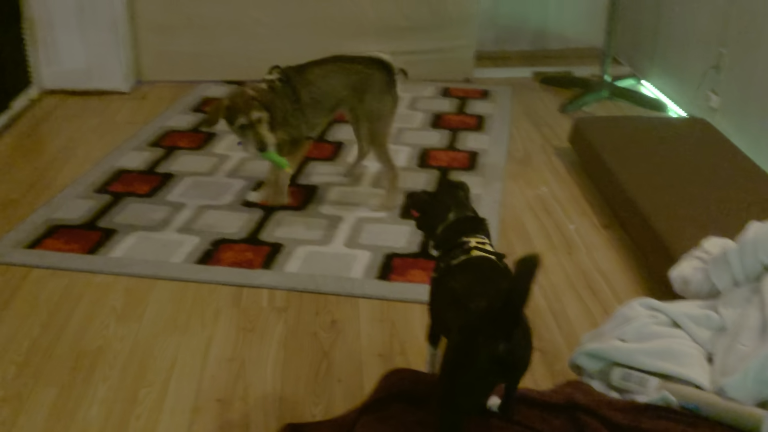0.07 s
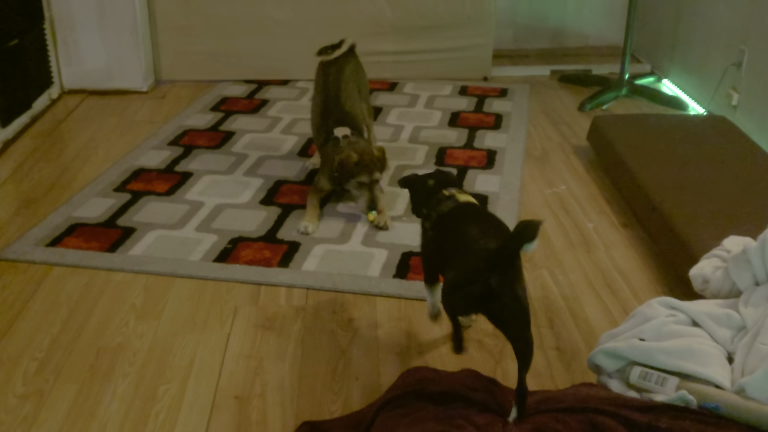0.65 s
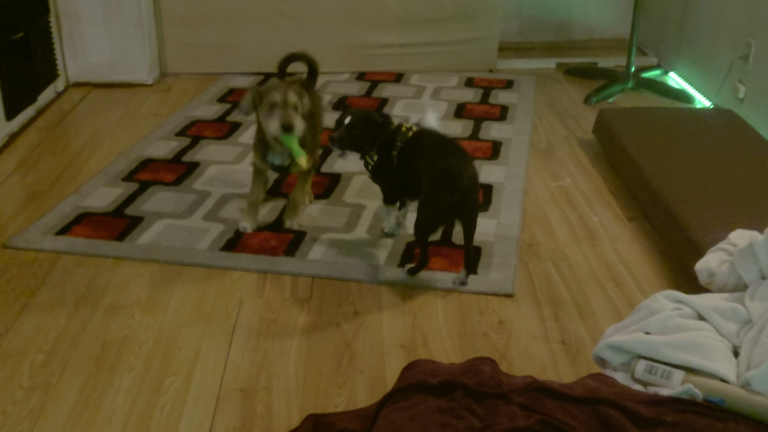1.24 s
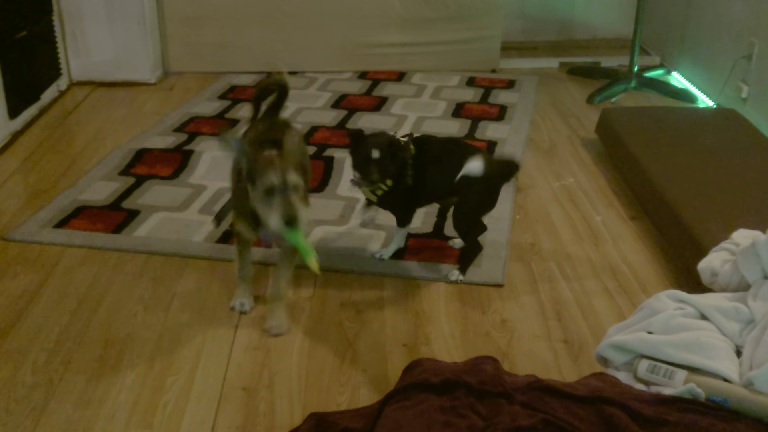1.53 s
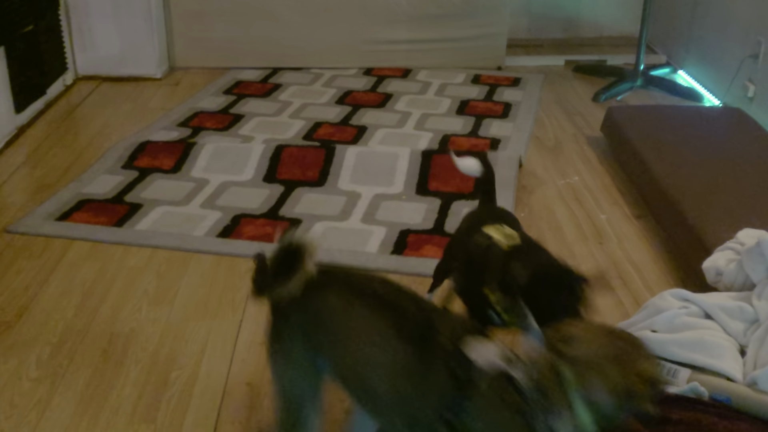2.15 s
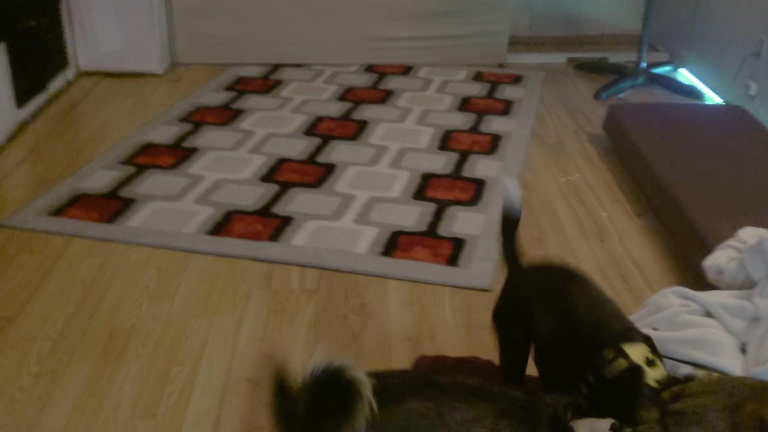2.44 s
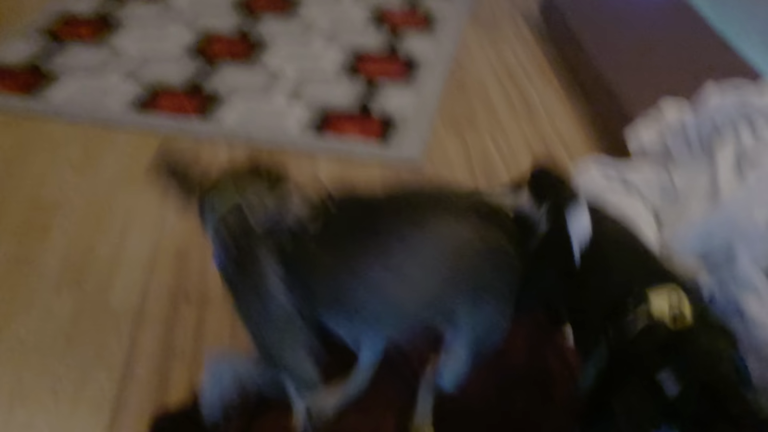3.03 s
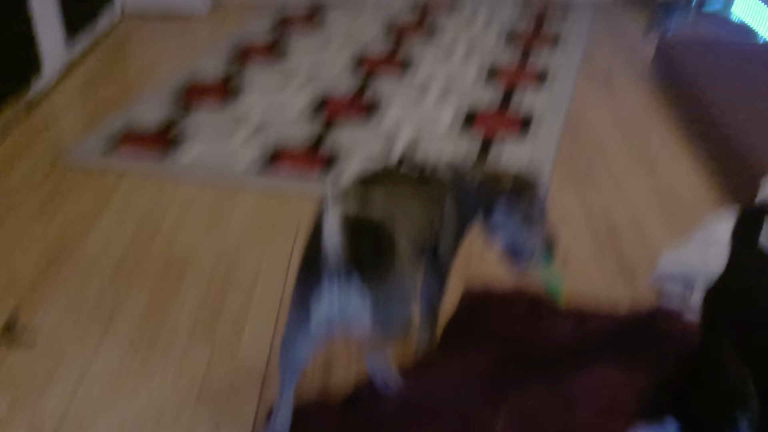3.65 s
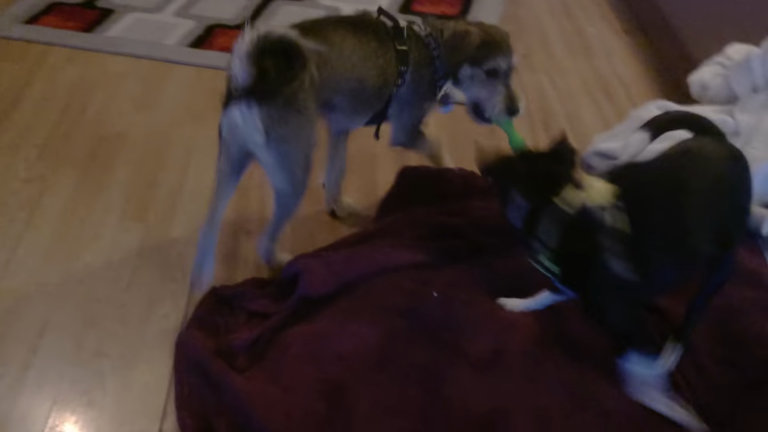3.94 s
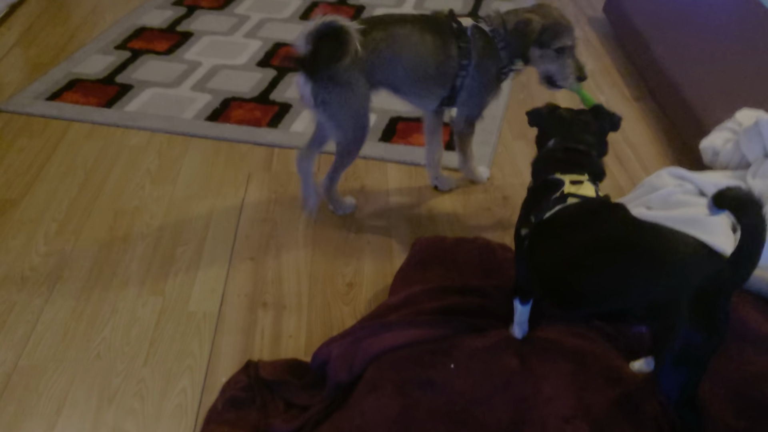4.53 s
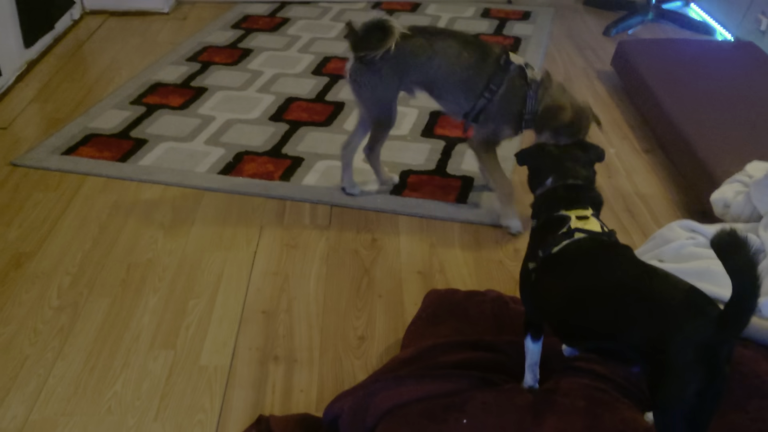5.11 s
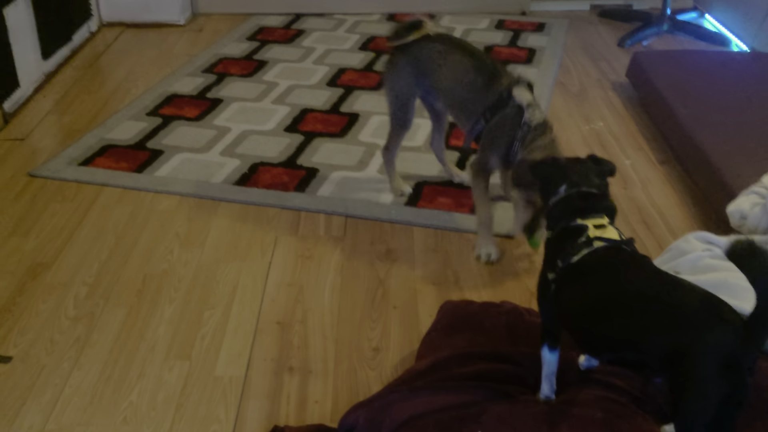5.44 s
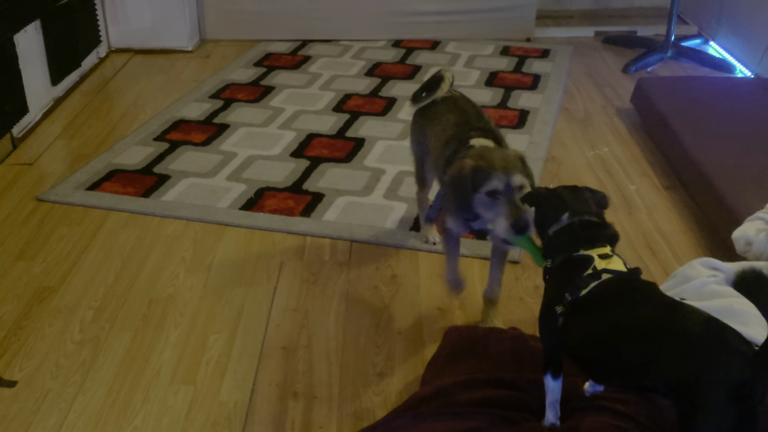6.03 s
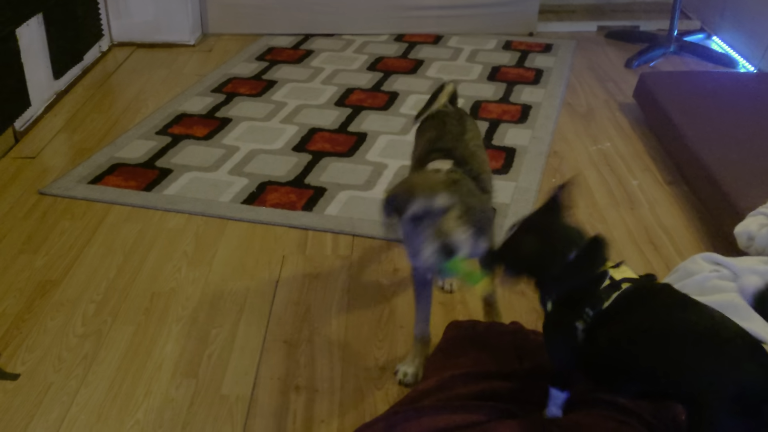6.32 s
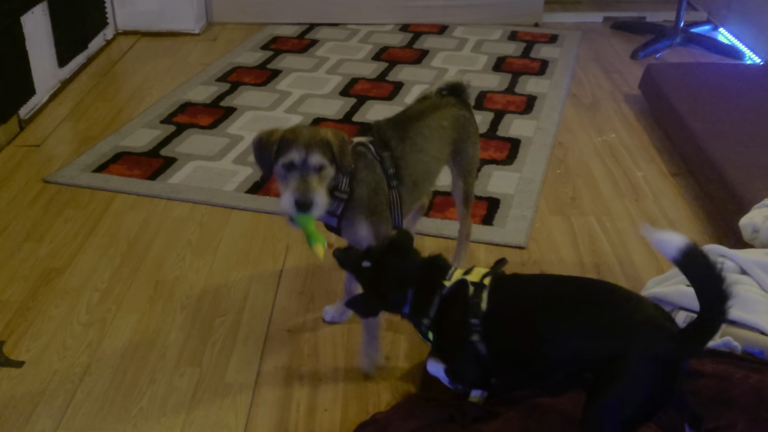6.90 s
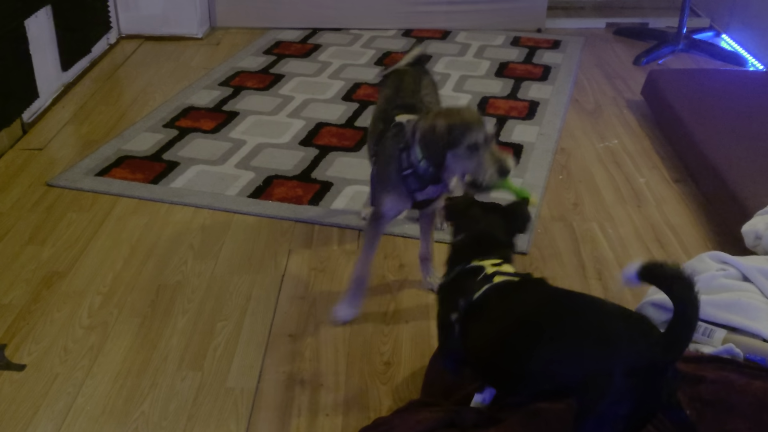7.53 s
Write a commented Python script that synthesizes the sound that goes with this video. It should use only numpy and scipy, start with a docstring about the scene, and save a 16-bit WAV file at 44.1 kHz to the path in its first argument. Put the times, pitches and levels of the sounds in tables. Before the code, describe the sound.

Over the steady low hum of an appliance, two dogs start with a few light steps, then dash about, claws clicking and scraping on wooden boards, metal tags clinking and paws landing with dull knocks. The rush eases into occasional taps and jingles, with brief livelier moments midway and near the end. The small living room adds a short echo, and the claws sound crisp.

```python
"""Two dogs romp with a toy on a wooden floor and a rug in a small living room.
Their claws tap and skid, their metal collar tags knock together and ring, and their paws thud.
Something rubbery squeaks. Rustling and light steps get louder when the dogs are livelier.
An appliance hums underneath, and the right microphone opening rings near 5 kHz."""
import sys
import numpy as np
from scipy import signal
from scipy.fft import rfft, irfft, next_fast_len
from scipy.io import wavfile

SR = 44100
rng = np.random.default_rng(int(sys.argv[2]) if len(sys.argv) > 2 else 0)


def digitize_waveform(pressure):
    """Quantize a signal to 16-bit integers and store it at the path in sys.argv[1].

    Rows of a 2-D input are taken as channels; values are limited to [-1, 1].
    """
    field = np.atleast_2d(pressure).T
    bounded = np.clip(field, -1, 1)
    quanta = np.round(bounded * 32767).astype(np.int16)
    wavfile.write(sys.argv[1], SR, quanta)


N = 342657

# Claws hitting the boards: start_s, tap_db, skid_db
CLAW_HITS = [(0.151, -44, -34.5), (0.625, -53, -37), (0.69, -42, -49), (0.7283, -52, -41),
             (0.838, -35.5, -36.5), (1.3486, -20.5, -27.5), (1.462, -41, -41), (1.493, -36, -42),
             (1.5387, -15, -21.5), (1.582, -15, -28.5), (1.697, -22, -30), (1.7085, -15, -42),
             (1.7956, -28, -21), (1.8515, -37, -36), (1.9309, -27, -24), (2.0027, -25, -43),
             (2.0875, -24, -29.5), (2.38, -45, -51), (2.5434, -32, -44), (3.06, -39.5, -76),
             (3.3266, -29, -42), (4.071, -27.5, -45), (4.298, -38, -42), (4.582, -37, -51),
             (4.691, -45.5, -56), (5.894, -51.5, -41.5), (6.0921, -47, -41.5), (6.7007, -27.5, -34),
             (6.8402, -25, -59), (7.0102, -44.5, -50), (7.432, -29, -38)]
# The tone of claws on wood: pitch_hz, gain_db
CLAW_TONE = [(200, -9), (700, -6), (1500, -2), (2500, -1.5), (4500, 0), (6200, -0.5), (10000, -1.5),
             (13000, -1.5), (16000, -1.5)]
def claws(tap_gain_db=11, skid_gain_db=15, tap_s=0.00096, skid_s=0.0059, ring_hz=5500):
    """The claws of a paw land almost together, then skid in tiny slips, ringing a little."""
    out, t = np.zeros((2, N)), np.arange(SR // 8) / SR
    for start_s, tap_db, skid_db in CLAW_HITS + light_steps():
        pitch_hz = ring_hz * np.exp(0.04 * rng.normal())   # no two claws ring alike
        tap = grains(12000, 3.3, len(t)) * t * np.exp(-(t / tap_s) ** 2 / 2)
        skid = grains(3500, 27, len(t)) * (t / skid_s) ** 0.45 * np.exp(-t / skid_s)
        tap, skid = [unit_energy(x + resonance(x, pitch_hz, width_hz=1700)) for x in (tap, skid)]
        add(out, start_s, from_db(tap_db + tap_gain_db) * tap + from_db(skid_db + skid_gain_db) * skid)
    return shape_tone(out, CLAW_TONE)


def light_steps(per_s=5, running_db=-40, uneven_db=6):
    """Extra claw hits at random moments: faint, but stronger when the dogs are lively."""
    steps = []
    for step, luck in enumerate(rng.random((60, 3))):
        start_s = (step + luck[0]) / per_s
        tap_db, skid_db = running_db + liveliness_db(start_s) + uneven_db * (2 * luck[1:] - 1)
        if start_s < N / SR:
            steps.append((start_s, tap_db, skid_db))
    return steps


# Paws sliding on the boards: start_s, level_db, length_s
PAW_SLIDES = [(1.081, -30, 0.079), (1.674, -25, 0.028), (1.795, -30.5, 0.04), (1.849, -25, 0.041),
              (1.936, -25.5, 0.042), (2.133, -31, 0.047), (2.2, -28, 0.044), (2.482, -40, 0.18),
              (3.338, -36.5, .025), (3.554, -27, 0.055), (4.068, -42.5, 0.13), (4.294, -31.5, 0.051),
              (5.539, -43, 0.16), (6.283, -44.5, 0.098), (7.424, -38, 0.08)]
def slides(gain_db=-10, slips_per_s=3500):
    """Claws catch on the wood as a paw slides; the scrape swells quickly and fades."""
    out, t = np.zeros((2, N)), np.arange(SR // 4) / SR
    for start_s, level_db, length_s in PAW_SLIDES:
        pressure = np.sin(np.pi * np.minimum(t / length_s, 1) ** 0.52)
        slips = unit_power(grains(slips_per_s, 4.7, len(t)))
        add(out, start_s, from_db(level_db + gain_db) * pressure * slips)
    return shape_tone(out, CLAW_TONE)


# Collar tags knocking together: start_s, clash_db, ring_db, small_tag_share (0 to 1)
TAG_KNOCKS = [(0.3207, -51, -62, 0.2), (0.7276, -37, -51, .1), (0.783, -37, -51, 1),
              (0.9784, -40, -39.5, 0.91), (1.1836, -38, -38, 0.7), (1.2451, -33, -37, .05),
              (1.3148, -18, -28, 0.6), (1.3472, -8, -29, 0.03), (1.4126, -45, -54, .15),
              (1.507, -33, -38, 0), (1.5742, -27, -32.5, 0.47), (1.684, -19, -24, 0.88),
              (1.7064, -12.5, -33, 0.24), (1.93, -25, -39.5, .6), (2.158, -26, -46, .9),
              (2.3515, -33, -48.5, 0), (2.392, -27, -41, 0.27), (2.5425, -18, -39, 0.7),
              (2.5516, -24, -24, 0.67), (2.6617, -30, -34.5, 0.17), (2.7969, -27, -42, .05),
              (2.858, -25, -36, 0), (3.016, -38, -47.5, 0.2), (3.1868, -38, -54, 0.2),
              (3.4657, -36, -42.5, 0.1), (3.8426, -40, -56, 0.6), (3.934, -20.5, -41.5, .15),
              (4.038, -43, -39.5, 0.96), (4.073, -24, -42.5, .2), (4.4459, -33.5, -49, 0.3),
              (4.5125, -38, -47, 0.4), (5.1357, -50, -59.5, .15), (5.464, -57, -56, 0.1),
              (5.5911, -38, -45, .1), (6.1, -52, -52.5, .2), (6.2565, -46, -49, 0.4),
              (6.6358, -37, -49, .05), (7.009, -28.5, -48.5, 0.3), (7.4794, -41, -50, 0.7),
              (7.596, -55, -42, 0.5)]
# The notes of each tag: pitch_hz, level_db, fade_s (time to fall by 60 dB)
LARGE_TAG_NOTES = [(3569, -17, 0.11), (7560, -2.5, .09), (9380, 0.5, 0.13), (9500, -5, .12),
                   (11130, 2, 0.2), (11040, 1.5, 0.16), (14000, 0, 0.1)]
SMALL_TAG_NOTES = [(5146, -20.5, 0.38), (6540, -15.5, 0.099), (9500, 2, 0.12), (13050, -3.5, 0.057),
                   (13250, -2, 0.12), (13850, -7.5, 0.099)]
def tags(ring_gain_db=-4, clash_gain_db=11, chatter_s=0.0026, bounce_s=0.016, detune=.0025, blur=.003):
    """Two tags chatter and bounce; as they touch, they push each other's notes slightly out of tune."""
    out, t = np.zeros((2, N)), np.arange(SR // 4) / SR
    for start_s, clash_db, ring_db, small_share in TAG_KNOCKS + tag_swings():
        bounces = from_db(-7) * grains(200, 2.6, len(t)) * np.exp(-t / bounce_s)
        touches = grains(3000, 7.6, len(t)) * np.sqrt(t / chatter_s) * np.exp(-t / chatter_s)
        chatter = unit_energy(touches + bounces)
        clash = resonance(np.diff(chatter, prepend=0), pitch_hz=12200, width_hz=4500)
        sound = from_db(clash_db + clash_gain_db) * unit_energy(clash)
        for notes, share in ((LARGE_TAG_NOTES, 1 - small_share), (SMALL_TAG_NOTES, small_share)):
            for pitch_hz, level_db, fade_s in notes:
                # every touch feeds energy into the note, which then dies away
                energy_kept = from_db(-60 / (fade_s * SR)) ** 2
                swell = np.sqrt(signal.lfilter([1], [1, -energy_kept], chatter ** 2))
                wobble = np.cumsum(rng.standard_normal(len(t))) * np.sqrt(2 * np.pi * blur * pitch_hz / SR)
                ring = swell * np.sin(2 * np.pi * pitch_hz * (1 + detune * rng.normal()) * t + wobble)
                gain = from_db(ring_gain_db + ring_db + level_db + rng.normal(0, 5))
                sound += gain * np.sqrt(share) * ring
        add(out, start_s, sound)
    return out


def tag_swings(delay_s=.085, running_loss_db=11, follows=0.3):
    """After each knock the tags swing back for a lighter one, faintest when the dogs are calm."""
    knocks = []
    for start_s, clash_db, ring_db, small_share in TAG_KNOCKS:
        loss_db = running_loss_db - follows * liveliness_db(start_s)
        return_s = start_s + delay_s * rng.uniform(0.56, 1.3)
        knocks.append((return_s, clash_db - loss_db, ring_db - loss_db, small_share))
    return knocks


# A tag ringing on its own: start_s, level_db, pitch_hz, fade_s (time to fall by 60 dB)
TAG_PINGS = [(2.545, -53, 5146, 0.69), (2.664, -47, 3569, 0.19), (2.86, -54.5, 3569, 0.23),
             (3.937, -50, 3569, 0.059), (4.073, -56, 3569, .13), (6.637, -58, 3569, .08)]
def tag_pings():
    """Hanging clear of its neighbour, a tag rings cleanly on its lowest note."""
    out, t = np.zeros((2, N)), np.arange(SR // 3) / SR
    for start_s, level_db, pitch_hz, fade_s in TAG_PINGS:
        fade = from_db(level_db - 60 * t / fade_s)
        add(out, start_s, fade * np.sin(2 * np.pi * pitch_hz * t), lag_spread_s=0)
    return out


# Paws and bodies landing: start_s, thud_db, scuff_db, board_pitch_hz
LANDINGS = [(0.17, -40, -65, 255), (0.625, -34, -51.5, 317), (0.684, -31.5, -62, 245),
            (1.262, -35.5, -48.5, 256), (1.325, -43, -38.5, 304), (1.47, -38.5, -43, 200),
            (1.58, -43, -55, 323), (1.66, -37, -48, 458), (1.841, -33.5, -51, 250), (1.936, -36, -63, 262),
            (2.202, -46, -49, 320), (2.495, -35.5, -41.5, 504), (3.322, -32, -55, 284),
            (3.549, -52, -49, 300), (3.88, -40, -50, 250), (4.064, -39.5, -54, 275),
            (4.289, -38.5, -67, 238)]
# The tone of a landing: pitch_hz, gain_db
THUD_TONE = [(60, -17), (130, -12), (240, -7), (340, -9.5), (520, -13), (900, -41), (2500, -19)]
def thuds(gain_db=29, settle_s=.02):
    """Soft paws push on the boards, which answer with a short, dull knock."""
    out, t = np.zeros((2, N)), np.arange(SR // 4) / SR
    for start_s, thud_db, _, board_pitch_hz in LANDINGS:
        push = unit_energy(grains(3000, 18, len(t)) * np.exp(-t / settle_s))
        board = unit_energy(resonance(push, board_pitch_hz, width_hz=160))
        add(out, start_s, from_db(thud_db + gain_db) * (push + board))
    return shape_tone(out, THUD_TONE)


# Rubbery squeaks: start_s, pitch_hz, level_db, length_s
RUBBER_SQUEAKS = [(0.9417, 2837, -35.5, 0.0072), (0.949, 2827, -40.5, 0.016), (1.296, 1094, -41.5, 0.033)]
def squeaks():
    """Something rubbery sticks and slips with a short whistle."""
    out, t = np.zeros((2, N)), np.arange(SR // 10) / SR
    for start_s, pitch_hz, level_db, length_s in RUBBER_SQUEAKS:
        pressure = np.sin(np.pi * np.minimum(t / length_s, 1))
        whistle = np.sin(2 * np.pi * pitch_hz * t)
        add(out, start_s, from_db(level_db) * pressure * whistle, lag_spread_s=0)
    return out


# The low tone of dragging paws: pitch_hz, gain_db
SCRAMBLE_TONE = [(70, -4.5), (120, 0.5), (250, -2.5), (500, 4.5), (1200, -1.5), (2200, -9.5), (4000, -23.5),
                 (9000, -29)]
def scramble(running_db=-54, follows=0.7, scuff_gain_db=-5.5, scuff_s=0.062):
    """Running paws drag over rug and boards, with a louder scuff at each landing."""
    t = np.arange(N) / SR
    level = from_db(running_db + follows * liveliness_db(t))
    for start_s, _, scuff_db, _ in LANDINGS:
        swell = np.interp(t - start_s, [0, scuff_s / 2, scuff_s], [0, 1, 0])
        level += from_db(scuff_db + scuff_gain_db) * swell
    return level * rubbing(SCRAMBLE_TONE, slips_per_s=1500, patchy_db=1.5)


# The bright tone of brushing fur and paws: pitch_hz, gain_db
RUSTLE_TONE = [(300, -6.5), (1500, -7), (3000, -3), (6000, -13), (10000, -10.5), (16000, -17.5)]
def rustle(running_db=-58, follows=0.82):
    """Paws and fur brush the floor as the dogs move."""
    level = from_db(running_db + follows * liveliness_db(np.arange(N) / SR))
    return level * rubbing(RUSTLE_TONE, slips_per_s=1600, patchy_db=4)


def rubbing(tone, slips_per_s, patchy_db):
    """Rubbing is a crowd of tiny slips that come in uneven clumps."""
    slips = grains(slips_per_s, 5.7, N)
    clumps = from_db(patchy_db * np.clip(drift(45), -2, 1.5))
    return unit_power(shape_tone(slips * clumps, tone))


# How hard the dogs are moving: time_s, level_db
LIVELINESS = [(0.0, -67), (0.6, -61), (0.84, -50.5), (1.4, -46), (1.56, -41), (1.82, -40.5), (2.08, -46),
              (2.29, -51), (2.77, -57), (2.94, -59), (3.92, -61), (4.09, -52.5), (4.39, -54), (4.7, -63),
              (5.28, -68.5), (6.92, -60), (7.12, -66), (7.77, -59)]
def liveliness_db(time_s, full_run_db=-44):
    """How lively the dogs are: zero at a full run, below zero when calmer."""
    return np.interp(time_s, *np.transpose(LIVELINESS)) - full_run_db


# The notes of the motor: pitch_hz, level_db
HUM_NOTES = [(118.4, -56.8), (236.9, -67.5), (414.5, -75.5), (543.7, -70.5), (624.5, -69.5), (823.6, -66.5),
             (2175, -76.5), (2293, -76)]
# The tone of the rumble: pitch_hz, gain_db
RUMBLE_TONE = [(15, -58), (25, -43.5), (54, -6), (113, -1.5), (129, -3.5), (151, -13.5), (243, -9.5),
               (272, -13), (305, -10), (384, -20), (414, -18), (439, -21.5), (906, -14.5), (1210, -23),
               (2400, -30), (3120, -47), (5280, -120)]
# How alike the rumble is on the left and right: pitch_hz, likeness (0 to 1)
RUMBLE_LIKENESS = [(30, 0.8), (70, 1), (150, 0.95), (300, 0.92), (600, 0.7), (1200, 0.43), (4000, 0.17)]
def appliance(hum_gain_db=-1, waver_db=2, rumble_db=-48, boom_hz=68, hiss_db=-70, right_lag_s=0.00034):
    """Off to the left, a motor hums and its rumble makes the room boom, over a faint hiss."""
    t, hum = np.arange(N) / SR, np.zeros(N)
    for pitch_hz, level_db in HUM_NOTES:
        level = from_db(level_db + hum_gain_db + waver_db * drift(3.8))
        hum += level * np.sqrt(2) * np.sin(2 * np.pi * pitch_hz * t + .5 * drift(4))
    alike = at_pitch(RUMBLE_LIKENESS, np.fft.rfftfreq(N, 1 / SR))
    middle, side = rfft(rng.standard_normal((2, N)))
    noise = irfft(np.sqrt(1 + alike) * middle + np.sqrt(1 - alike) * side * [[1], [-1]], N)
    rumble = from_db(rumble_db) * unit_power(shape_tone(noise, RUMBLE_TONE))
    boom = from_db(-2) * resonance(rumble, boom_hz, width_hz=9)
    hiss = from_db(hiss_db) * rng.standard_normal((2, N))
    left, right = hum + rumble + boom + hiss
    return np.array([left, np.interp(t - right_lag_s, t, right)])


def room(sound, echo_db, fade_s=0.18, ceiling_s=0.0178):
    """The sound arrives, then a few echoes, then a thick wash once the ceiling has answered."""
    t = np.arange(SR // 2) / SR
    early = np.array([grains(2500, 12, len(t)) for _ in range(2)])
    early = from_db(-4) * unit_power(early) * (t > .002)
    late_share = np.clip((t - ceiling_s) / 0.0039, 0, 1)
    echoes = (1 - late_share) * early + late_share * rng.standard_normal((2, len(t)))
    echoes *= from_db(-60 * t / fade_s)
    # the microphones are close together, so they hear the same bass
    bass_cut = signal.butter(1, 450, "high", fs=SR, output="sos")
    side = signal.sosfilt(bass_cut, (echoes[0] - echoes[1]) / 2)
    echoes = echoes.mean(axis=0) + side * [[1], [-1]]
    response = from_db(echo_db) * unit_energy(echoes) + (t == 0)
    return signal.fftconvolve(sound, response, axes=1)[:, :N]


def from_db(db):
    """Turn decibels into a number to multiply by."""
    return 10 ** (np.asarray(db) / 20)


def unit_power(x):
    """Scale so that the squares average one."""
    return x / np.sqrt(np.mean(x ** 2) + 1e-20)


def unit_energy(x):
    """Scale so that the squares add up to one."""
    return x / np.sqrt(np.sum(x ** 2, axis=-1, keepdims=True) + 1e-20)


def at_pitch(table, pitch_hz):
    """Read between a table's rows, giving every octave equal room."""
    known_hz, values = np.transpose(table)
    return np.interp(np.log(np.maximum(pitch_hz, 1)), np.log(known_hz), values)


def shape_tone(sound, tone):
    """Turn each pitch up or down as the tone table says."""
    size = 2 * next_fast_len(N // 2 + SR // 2)
    gains = from_db(at_pitch(tone, np.fft.rfftfreq(size, 1 / SR)))
    log_response = irfft(np.log(gains))
    # fold the filter forward in time so that nothing sounds early
    log_response[1:size // 2] *= 2
    log_response[size // 2 + 1:] = 0
    return irfft(rfft(sound, size) * np.exp(rfft(log_response)))[..., :N]


def drift(turns_per_s):
    """A slow random wander, about one unit in size."""
    points = rng.standard_normal(N // 100)
    return unit_power(np.interp(np.arange(N) / SR * turns_per_s, np.arange(len(points)), points))


def resonance(sound, pitch_hz, width_hz):
    """Keep a band around one pitch; the narrower it is, the longer it rings."""
    r = np.exp(-np.pi * width_hz / SR)
    feedback = [1, -2 * r * np.cos(2 * np.pi * pitch_hz / SR), r * r]
    return signal.lfilter(np.array([1, 0, -1]) * (1 - r * r) / 2, feedback, sound)


def grains(per_s, spread_db, size):
    """Tiny clicks of uneven strength at random moments."""
    clicks = (rng.random(size) < per_s / SR) * rng.choice([-1, 1], size)
    return clicks * from_db(spread_db * rng.uniform(-2.14, 1, size))


def add(track, start_s, sound, lag_spread_s=.00008):
    """Mix a sound into both sides; a tiny random lag on each gives it a direction."""
    for channel, lag_s in zip(track, rng.normal(0, lag_spread_s, 2)):
        start = max(round((start_s + lag_s) * SR), 0)
        channel[start:start + len(sound)] += sound[:max(N - start, 0)]


def scene():
    """The dogs in the room, over the appliance."""
    hard = room(claws() + slides(), echo_db=-2.5) + room(tags(), echo_db=-2)
    tones = room(tag_pings() + squeaks(), echo_db=-4)
    soft = room(rustle() + scramble() + thuds(), echo_db=-2)
    return hard + tones + soft + appliance()


# The tone of the two microphone openings: pitch_hz, left_db, right_db
MICROPHONE_TONE = [(70, 0, -3), (300, -1, 0), (1010, -5.5, -1.5), (2360, -2, 4), (3315, 2.5, 10.5),
                   (3920, 4.5, 15.5), (5700, -3, 18), (6120, -2.5, 16.5), (7054, -35, 8), (7660, -12, -10),
                   (9200, -11, -14.5), (9370, -3, -7), (13100, -0.5, 2.5), (16100, -6, -11.5)]
def record(dry):
    """Each microphone opening has its own tone; the deep bass and the highest treble are cut."""
    tone = np.array(MICROPHONE_TONE)
    heard = [shape_tone(dry[0], tone[:, [0, 1]]), shape_tone(dry[1], tone[:, [0, 2]])]
    bass_cut = signal.butter(2, 42.5, "high", fs=SR, output="sos")
    treble_cut = signal.ellip(10, .2, 70, 15900, fs=SR, output="sos")
    return signal.sosfilt(treble_cut, signal.sosfilt(bass_cut, heard))


dry = scene()
out = record(dry)
digitize_waveform(out)
```